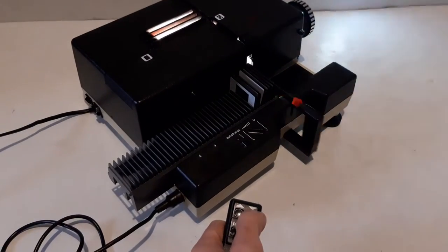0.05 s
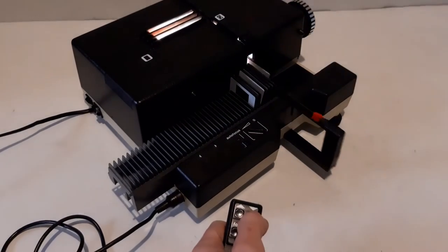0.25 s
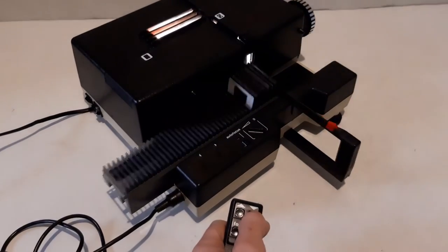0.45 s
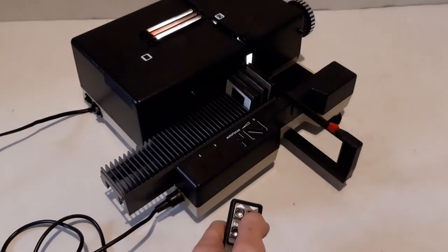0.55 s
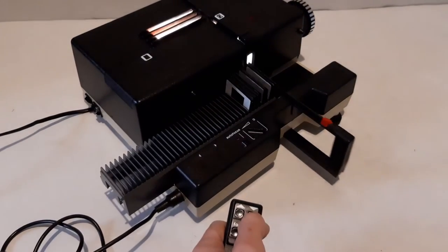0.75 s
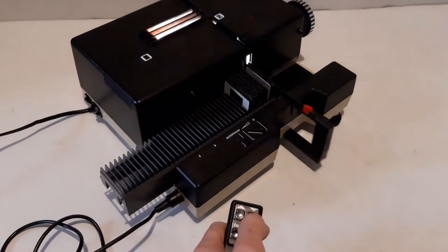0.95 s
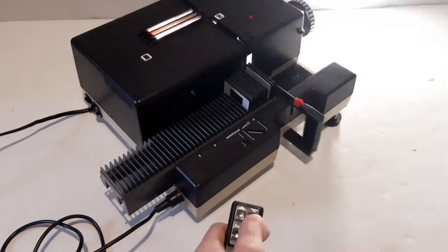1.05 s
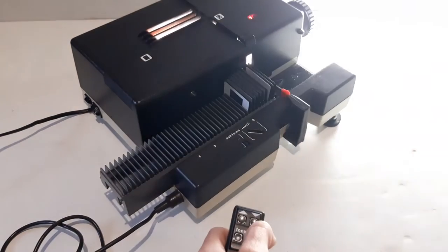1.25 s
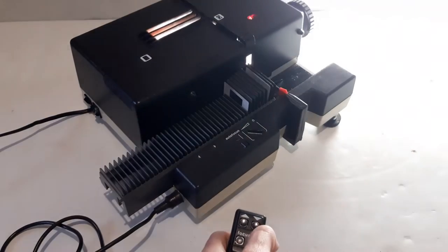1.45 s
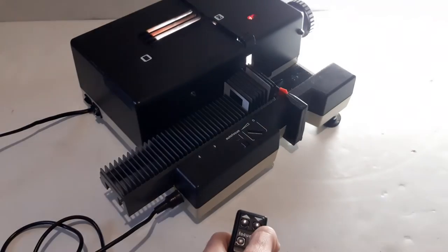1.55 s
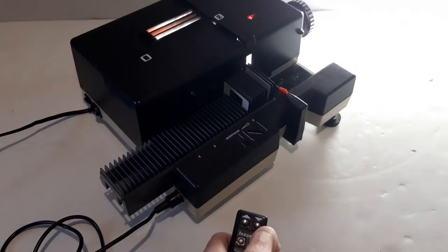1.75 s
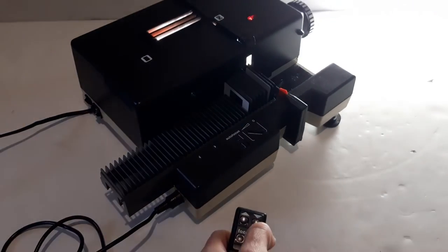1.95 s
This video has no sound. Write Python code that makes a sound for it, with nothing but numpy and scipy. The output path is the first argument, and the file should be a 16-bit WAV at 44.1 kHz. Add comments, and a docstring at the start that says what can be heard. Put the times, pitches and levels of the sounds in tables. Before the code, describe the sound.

A slide projector close by in a small room: geared motor whirring from the start, light clicks, a sharp plastic clack at half a second, smaller knocks, a soft latch, then only steady fan air and hum.

```python
"""Fan rush and mains hum under a slide change: whirring and scraping from the start, with knocks from 0.2 s.
A slide projector, close by in a small room. Fan air is shaped noise with duct resonances and a blade tone.
The motor's gears are narrow and broad noise. The slide arm rubs its guide in dense random grains.
Arm, tray and latch knock on the plastic case: each knock is a short noise contact with part resonances,
case modes and a room tail."""
import sys
import numpy as np
from scipy import signal
from scipy.fft import rfft, irfft
from scipy.io import wavfile
from scipy.ndimage import uniform_filter1d, map_coordinates

SR = 44100
rng = np.random.default_rng(int(sys.argv[2]) if len(sys.argv) > 2 else 0)


def digitize_waveform(pressure):
    """Quantize a signal to 16-bit integers and store it at the path in sys.argv[1].

    Rows of a 2-D input are taken as channels; values are limited to [-1, 1].
    """
    field = np.atleast_2d(pressure).T
    bounded = np.clip(field, -1, 1)
    quanta = np.round(bounded * 32767).astype(np.int16)
    wavfile.write(sys.argv[1], SR, quanta)


N = 88200
T = np.arange(N) / SR

# Fan air spectrum. Each row: frequency in Hz, relative density in dB per Hz.
AIR_SPECTRUM = [(25, -44), (60, -16), (130, -5), (230, -1), (320, 2), (480, -0.5), (800, 1), (1100, -6.5),
                (1500, -5.5), (2100, -11.5), (3100, -17.5), (3900, -15.5), (4300, -22.5), (6300, -26),
                (7700, -33.5), (8500, -45.5), (12000, -41), (16000, -44)]
# Fan duct resonances. Each row: frequency in Hz, half-width at half amplitude in Hz, level in dB.
DUCT_RESONANCES = [(344.8, 6.4, -46.5), (376.7, 16.2, -46), (445, 19, -57.5), (538.7, 9.4, -53.5),
                   (662.4, 14, -57), (1059, 59, -56.5), (3970, 240, -84)]
# Fan blade tone. Each row: time in seconds, frequency in Hz.
BLADE_TRACK = [(0, 836), (.3, 820), (.6, 818), (.9, 826), (1.4, 825), (1.65, 835), (2, 838)]
AIR_DB, BLADE_DB = -45.5, -56
MAINS_HZ, MAINS_DB, MAINS_LEFT_RE_RIGHT_DB = 101, -56.5, 8.5

# Changer motor effort. Each row: time in seconds, gain in dB.
EFFORT_TRACK = [(0, 3), (.14, -2), (.45, -9.5), (.75, 0.5), (1.05, 1.5), (1.25, -1), (1.45, -3.5),
                (1.55, -10.5), (2, -32)]
# Gear train resonances. Each row: frequency in Hz, half-width at half amplitude in Hz, level before effort in dB.
GEAR_RESONANCES = [(238, 35, -55.5), (320, 42, -53.5), (445.5, 14.5, -52), (690, 110, -55),
                   (3620, 160, -64.5)]
# Gear whirr spectrum. Each row: frequency in Hz, relative density in dB per Hz.
WHIRR_SPECTRUM = [(100, -39), (300, -2), (1000, 3.5), (2000, -30), (4000, -13), (7000, -17), (8500, -28.5),
                  (16000, -28)]
WHIRR_BEFORE_EFFORT_DB = -53.5
# Main gear tone. Each row: time in seconds, level in dB.
GEAR_TONE_TRACK = [(0, -59), (.14, -47.5), (.42, -53), (.71, -44.5), (.92, -49), (1.04, -43), (1.28, -51),
                   (1.43, -44.5), (1.53, -60), (2, -79)]
GEAR_TONE_HZ, GEAR_TONE_HALF_WIDTH_HZ = 521.4, 14.5

# Arm rubbing in its guide. Each row: time in seconds, level in dB.
RUB_TRACK = [(0, -48), (.04, -55.5), (.12, -48), (.19, -50.5), (.25, -54.5), (.32, -48.5), (.38, -57),
             (.42, -44), (.47, -45), (.486, -24), (.505, -33), (.535, -30.5), (.56, -36), (.61, -51),
             (.68, -76), (.95, -49.5), (1.1, -57), (1.5, -76)]
# Colour of the rubbing. Each row: frequency in Hz, relative density in dB per Hz.
RUB_SPECTRUM = [(100, -36), (500, 4), (1400, 2.5), (2500, 0), (4000, -8), (6500, -10.5), (8500, -16.5),
                (12000, -14.5), (16000, -16.5)]
RUB_GRAINS_PER_S, RUB_SCATTER_DB, RUB_GRAIN_DECAY_S = 1700, 1.5, 0.0011

# Knocks. Each row: start in seconds, thud, body, clack and tick gains in dB,
# decay of the touch curve in seconds, after-ring gain in dB, struck part.
KNOCKS = [(0.204, -53, -29, -47.5, -65, 0.0048, -17, "pawl"),
          (0.2668, -38, -38.5, -41.5, -49, 0.0033, -10, "lever"),
          (0.2994, -39, -36.5, -42, -54, 0.007, -8, "case"),
          (0.3057, -40, -28.5, -40, -44.5, 0.0026, -15, "case"),
          (0.3988, -47, -31, -29, -48, .0015, -14, "lever"),
          (0.4092, -39, -22.5, -27, -38, 0.0029, -16, "lever"),
          (0.437, -48, -38, -32, -39, 0.0043, -23, "lever"),
          (0.444, -29.5, -29.5, -29.5, -64, 0.0026, -13, "lever"),
          (0.486, -31, -22, -18, -40, 0.005, -20.5, "tray"),
          (0.4914, -24.5, -18, -7, -19.5, 0.0023, -22.5, "tray"),
          (0.4953, -22, -12.5, -25, -40, 0.0021, -14.5, "tray"),
          (0.5136, -55, -18.5, -33, -31, 0.0015, -20, "guide"),
          (0.5476, -30, -33, -17, -30, 0.0033, -18.5, "pawl"),
          (.552, -41, -22.5, -30.5, -34, 0.0029, -20.5, "pawl"),
          (0.7387, -37, -25.5, -30, -36, 0.0017, -17, "stop"),
          (0.9053, -52, -31.5, -50, -68, 0.0025, -19, "guide"),
          (0.914, -52, -30, -33, -47, 0.0042, -16, "guide"),
          (0.9201, -38, -24, -34.5, -49, 0.0032, -18.5, "guide"),
          (.931, -37, -37, -47, -66, 0.0032, -13.5, "guide"),
          (0.9757, -33.5, -22.5, -26.5, -26.5, 0.0043, -14.5, "gate"),
          (1.3889, -54, -32.5, -37.5, -55.5, 0.0057, -12.5, "latch"),
          (1.4277, -48, -35.5, -31.5, -45, 0.0059, -9.5, "latch"),
          (1.439, -43, -37, -46, -52, 0.0097, -15, "latch")]
# Centres of thud, body, clack and tick in Hz.
KNOCK_BANDS_HZ = [400, 1500, 4800, 9000]
# Colour of the struck case. Each row: frequency in Hz, gain in dB.
CASE_SPECTRUM = [(60, -8.5), (150, -13), (220, 19.5), (400, 17.5), (800, 16), (1200, 11.5), (1450, 13),
                 (1900, 11), (2450, 5.5), (2950, 10.5), (3300, 7), (4150, 8.5), (5000, 4), (5700, 9.5),
                 (6400, 7.5), (7000, 9), (7800, 6.5), (8500, -1), (9500, 2), (11500, 6.5), (16000, -4.5)]
# Modes of case and arm. Each row: frequency in Hz, relative amplitude in dB, T60 in seconds.
CASE_MODES = [(356, -18.5, 0.13), (1032, -20.5, 0.42), (1160, -28, 0.22), (1426, -18, 0.17),
              (1980, -16, 0.11), (2190, -21, 0.24), (3940, -25, 0.15), (5580, -14, 0.064)]
# Struck part resonances, by part. Each row: frequency in Hz, half-width at half power in Hz, gain in dB.
PART_RESONANCES = {"pawl": [(1443, 52, 11), (4330, 100, 3.5)], "stop": [(3560, 100, 7)],
                   "case": [(379.7, 12, 21.5)], "lever": [(826, 34, 9.5), (1760, 150, 5), (4620, 92, 5.5)],
                   "tray": [(568, 28, 3.8), (1140, 32, 6), (2870, 40, 4.5), (4060, 30, 9.5), (4200, 45, 7),
                   (5820, 240, 7.5)], "guide": [(1000, 130, 9), (1420, 55, 7)], "gate": [(1500, 23, 6),
                   (3920, 97, 11), (5390, 65, 10), (6900, 60, 7)], "latch": [(1906, 58, 9),
                   (3650, 52, 11.5), (4480, 60, 7.5)]}
CONTACT_RISE_S, TAIL_RISE_S = 0.00063, 0.002
ROOM_T60_LOW_S, ROOM_T60_HIGH_S, ROOM_SPLIT_HZ = 0.19, 0.18, 2600
ROOM_SHARE_DB, MODES_SHARE_DB = 0.5, 3.5  # within the after-ring

# Early reflections from table and wall. Each row: delay in seconds, gain in dB.
REFLECTIONS = [(.0031, -29), (.0073, -20.5), (0.013, -24.5), (0.0191, -27)]
# Stereo width. Each row: frequency in Hz, side re mid in dB.
WIDTH_SPECTRUM = [(40, -4), (120, -18), (600, -11), (1100, -5.5), (2000, -2), (5000, -0.5), (16000, 0.5)]
# Stereo balance. Each row: frequency in Hz, left re right in dB.
BALANCE_SPECTRUM = [(60, 4.5), (200, 0), (380, 2.5), (700, 1), (1290, -1.8), (2380, 3.5), (4400, -2.7),
                    (8100, 5), (15000, 1)]
RIGHT_LAG_S, TOP_HZ = .000045, 16000


def undb(db):
    """Decibels to gain."""
    return 10 ** (np.asarray(db) / 20)


def unit(x):
    """Scale to rms 1."""
    return x / np.sqrt(np.mean(x ** 2))


def curve(rows):
    """Join (s, value) rows by straight lines."""
    return np.interp(T, *np.array(rows).T)


def spectrum(rows, size):
    """Gain per transform bin from (Hz, dB) rows, interpolated on log frequency."""
    hz, db = np.array(rows, float).T
    bins_hz = np.fft.rfftfreq(size, 1 / SR)
    return undb(np.interp(np.log(bins_hz + 1), np.log(hz), db))


def colour(x, gain):
    """Minimum-phase filter with the given gain per bin, by folding the cepstrum."""
    size = x.shape[-1]
    cepstrum = irfft(np.log(gain), size)
    cepstrum[1:size // 2] *= 2
    cepstrum[size // 2 + 1:] = 0
    response = np.exp(rfft(cepstrum))
    return irfft(rfft(x) * response, size)


def noise(gain):
    """A pair of random-phase noises, joint rms 1, with the given spectrum."""
    phase = 2 * np.pi * rng.random((2, N // 2 + 1))
    return unit(irfft(gain * np.exp(1j * phase), N))


def resonances(rows):
    """Sum of noises ringing in narrow (Hz, half-width Hz, dB) resonances."""
    f = np.fft.rfftfreq(N, 1 / SR)
    return sum(undb(db) * noise(1 / (1 + ((f - hz) / width_hz) ** 2)) for hz, width_hz, db in rows)


def part_gain(part, size):
    """Gain per bin of a part: resonance powers added to a flat response."""
    f = np.fft.rfftfreq(size, 1 / SR)
    added_power = sum((undb(db) ** 2 - 1) / (1 + ((f - hz) / width_hz) ** 2)
                      for hz, width_hz, db in PART_RESONANCES[part])
    return np.sqrt(1 + added_power.clip(0))


def reflect(pair):
    """Table and wall add weak delayed copies, which ripple the spectrum."""
    f = np.fft.rfftfreq(2 * N, 1 / SR)
    echoes = sum(undb(db) * np.exp(-2j * np.pi * f * delay_s) for delay_s, db in REFLECTIONS)
    return irfft(rfft(pair, 2 * N) * (1 + echoes), 2 * N)[:, :N]


def spread(pair):
    """Mid and side from two signals: left and right alike in the bass, less so in the treble."""
    width = spectrum(WIDTH_SPECTRUM, pair.shape[-1])
    norm = np.sqrt(1 + width ** 2)
    mid, side = colour(pair[0], 1 / norm), colour(pair[1], width / norm)
    return np.array([mid + side, mid - side])


def transformer():
    """Steady sine mains hum, louder on the left."""
    pan = undb(np.array([[MAINS_LEFT_RE_RIGHT_DB], [-MAINS_LEFT_RE_RIGHT_DB]]) / 2)
    return pan * undb(MAINS_DB) * np.sqrt(2) * np.sin(2 * np.pi * MAINS_HZ * T)


def fan():
    """Air rushes through a resonant duct; the blade tone sags while the changer loads the motor."""
    air = undb(AIR_DB) * noise(spectrum(AIR_SPECTRUM, N)) + resonances(DUCT_RESONANCES)
    blade_phase = 2 * np.pi * np.cumsum(curve(BLADE_TRACK)) / SR
    blade = undb(BLADE_DB) * np.sqrt(2) * np.sin(blade_phase)
    return air + np.array([[1], [0]]) * blade  # tone in mid only


def changer():
    """Gear train drone and whirr, both scaled by motor effort."""
    drone = resonances(GEAR_RESONANCES)
    whirr = undb(WHIRR_BEFORE_EFFORT_DB) * noise(spectrum(WHIRR_SPECTRUM, N))
    return undb(curve(EFFORT_TRACK)) * (drone + whirr)


def gear_tone():
    """Main gear tone: narrow noise keeps its quick flutter, slow level follows the track."""
    tone = resonances([(GEAR_TONE_HZ, GEAR_TONE_HALF_WIDTH_HZ, 0)])
    slow_rms = np.sqrt(uniform_filter1d(tone ** 2, size=4000, axis=-1))
    return undb(curve(GEAR_TONE_TRACK)) * tone / slow_rms


def rubbing():
    """Dense tiny slips of the plastic arm in its guide: decaying noise grains, coloured by the tray."""
    starts = rng.random(N) < RUB_GRAINS_PER_S / SR
    slips = starts * undb(RUB_SCATTER_DB * np.minimum(rng.exponential(size=N), 4))
    envelope = signal.lfilter([1], [1, -np.exp(-1 / (RUB_GRAIN_DECAY_S * SR))], slips)
    grains = envelope * rng.standard_normal((2, N))
    gain = spectrum(RUB_SPECTRUM, N) * part_gain("tray", N)
    return undb(curve(RUB_TRACK)) * unit(colour(grains, gain))


def fade(t, t60_s):
    """Exponential decay, -60 dB at t60_s."""
    return np.exp(-np.log(1000) * t / t60_s)


def contact(chatter, t, contact_s):
    """Chattering contact: noise burst, spectrum flattened, then gated and scaled to the touch curve's rms."""
    touch = (1 - np.exp(-t / CONTACT_RISE_S)) * np.exp(-t / contact_s)
    flat = irfft(np.exp(1j * np.angle(rfft(chatter * touch))), len(t))
    return unit(flat * np.sqrt(touch)) * np.sqrt(np.mean(touch ** 2))


def room_tail(room, t):
    """Room dying away: noise in two bands with separate decays."""
    low = signal.sosfilt(signal.butter(2, ROOM_SPLIT_HZ, fs=SR, output="sos"), room)
    high = signal.sosfilt(signal.butter(2, ROOM_SPLIT_HZ, "high", fs=SR, output="sos"), room)
    # minus: the two filters are in antiphase at the split
    tail = low * fade(t, ROOM_T60_LOW_S) - high * fade(t, ROOM_T60_HIGH_S)
    return tail * (1 - np.exp(-t / TAIL_RISE_S))


def case_modes(t):
    """Case and arm modes: decaying sines, random phase per channel."""
    return sum(undb(db) * fade(t, t60_s) * np.sin(2 * np.pi * (hz * t + rng.random((2, 1))))
               for hz, db, t60_s in CASE_MODES)


def knock(band_db, contact_s, ring_db, part, size=22050):
    """Contact plus after-ring of room and modes, coloured by part, case and knock bands."""
    t = T[:size]
    chatter, room = rng.standard_normal((2, 2, size))
    crack = contact(chatter, t, contact_s)
    tail = room_tail(room, t)
    ring = undb(ring_db) * (undb(ROOM_SHARE_DB) * tail + undb(MODES_SHARE_DB) * case_modes(t))
    bands = spectrum(list(zip(KNOCK_BANDS_HZ, band_db)), size)
    return colour(crack + ring, part_gain(part, size) * spectrum(CASE_SPECTRUM, size) * bands)


def knocks():
    """Arm, tray and latch strike the case: each knock added at its start."""
    out = np.zeros((2, 2 * N))
    for start_s, *band_db, contact_s, ring_db, part in KNOCKS:
        hit, i = knock(band_db, contact_s, ring_db, part), int(start_s * SR)
        out[:, i:i + hit.shape[1]] += hit
    return out[:, :N]


def scene():
    """Projector in stereo: reflections, width, balance and right lag; the hum bypasses these."""
    sources = fan() + changer() + gear_tone() + rubbing() + knocks()
    pair = spread(reflect(sources))
    lean = np.sqrt(spectrum(BALANCE_SPECTRUM, N))  # half the balance per side
    left, right = colour(pair[0], lean), colour(pair[1], 1 / lean)
    right = map_coordinates(right, [(T - RIGHT_LAG_S) * SR], order=5, mode="mirror")
    return np.array([left, right]) + transformer()


def record(dry):
    """Steep elliptic low-pass cuts the top."""
    return signal.sosfilt(signal.ellip(10, .2, 80, TOP_HZ, fs=SR, output="sos"), dry)


dry = scene()
out = record(dry)
digitize_waveform(out)
```